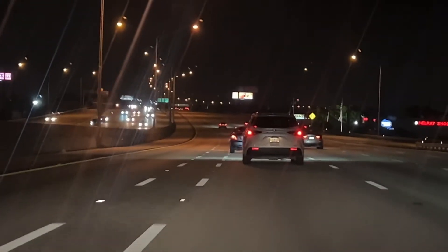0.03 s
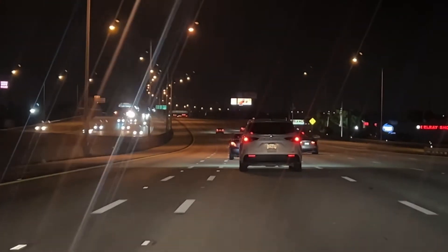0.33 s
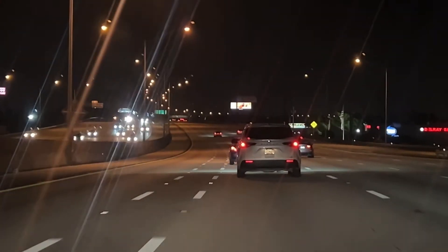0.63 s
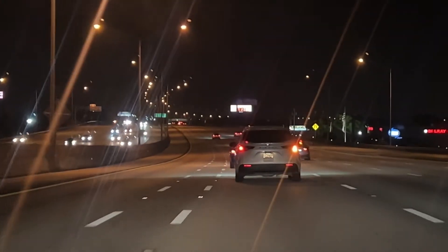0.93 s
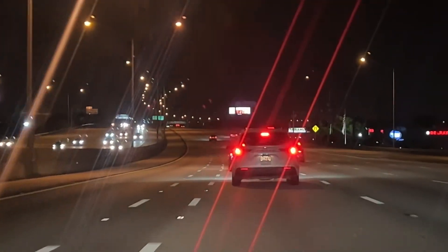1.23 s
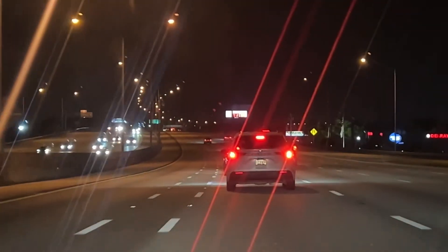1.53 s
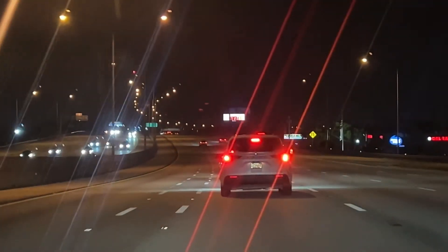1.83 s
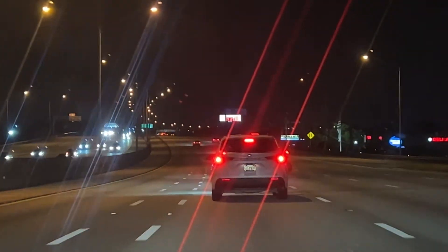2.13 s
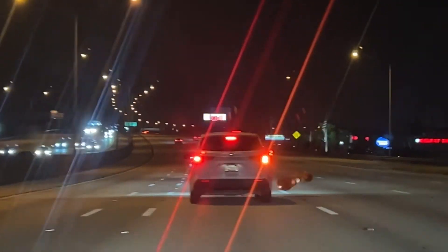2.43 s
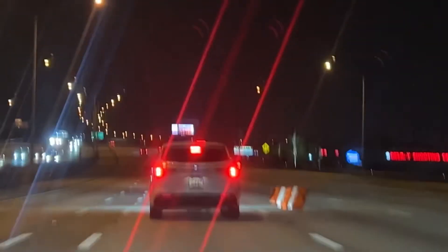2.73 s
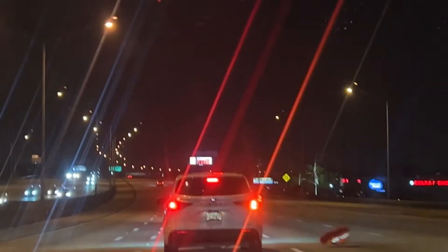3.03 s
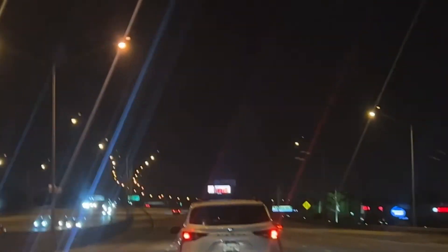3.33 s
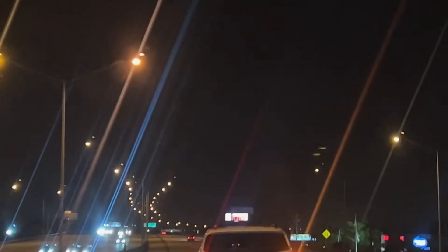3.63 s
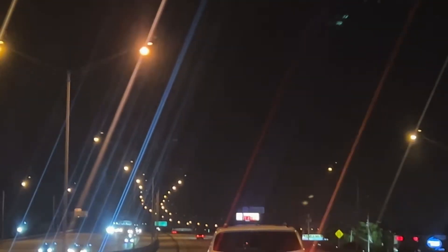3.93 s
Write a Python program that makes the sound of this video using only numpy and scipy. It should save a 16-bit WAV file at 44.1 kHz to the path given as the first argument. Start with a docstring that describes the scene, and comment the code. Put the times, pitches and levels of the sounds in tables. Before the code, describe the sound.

Inside a car at highway speed, tyres rumble and the cabin booms, wheels thudding over seams. Close to the microphone, a grip shifts on a plastic case: faint ticks, a knock, a growing dry rustle, then a sharp snap.

```python
"""Inside a car on a highway at night. From the start, tyres rumble through the body all around, the air inside
the tyres booms over the drone of the drive train, and air hisses faintly at the window seals. Soon the wheels
begin to thump over seams. Right at the microphone a hand shifts its grip on a plastic case: a few faint ticks,
a knock at 1.6 s, then a dry sliding rustle that builds among more knocks. The case snaps once, sharply, at 3.3
s, and the hand settles."""
import sys
import numpy as np
from scipy import signal
from scipy.fft import rfft, irfft
from scipy.io import wavfile

SR = 44100
rng = np.random.default_rng(int(sys.argv[2]) if len(sys.argv) > 2 else 0)


def dump(signal):
    """Clip the signal to [-1, 1] and save it as 16-bit WAV at the path in sys.argv[1]."""
    limited = np.clip(np.atleast_2d(signal).T, -1, 1)
    pcm = np.round(limited * 32767).astype(np.int16)
    wavfile.write(sys.argv[1], SR, pcm)


N = 176400
T, HZ = np.arange(N) / SR, np.maximum(np.arange(N // 2 + 1) * SR / N, 1)

# Knocks and clicks of the case. Each row: start in seconds, level in dB in the low, middle, high and
# top band, pitch in Hz of the part that rings most, its level in dB.
CONTACTS = [(0.378, -65, -76, -68.5, -67, 6670, -76.5), (.515, -67, -81.5, -71.5, -79, 7100, -72),
            (1.362, -66, -70, -72, -74, 6880, -68), (1.582, -27, -50, -56, -68, 1198, -23.5),
            (1.585, -38, -41.5, -47, -66, 2215, -35), (1.594, -41.5, -54, -58, -73, 1475, -38),
            (1.82, -50, -51, -54, -72, 4700, -47), (2.023, -46, -67, -44.5, -62, 9060, -42),
            (2.332, -59, -61, -56, -64, 6900, -55), (2.369, -51, -54, -66, -68, 2620, -52),
            (2.41, -54.5, -66, -49.5, -54, 2290, -47), (2.457, -53, -59.5, -46.5, -57, 8100, -55),
            (2.571, -46, -43.5, -49, -70, 6280, -36.5), (2.578, -40, -45, -60, -68, 2370, -29.5),
            (2.68, -65, -67, -60, -73, 6900, -62), (2.729, -56.5, -59, -47.5, -66, 7500, -59),
            (2.895, -50, -56, -52, -62, 6200, -48), (2.993, -36, -33.5, -38, -52, 7540, -30),
            (3.073, -44.5, -45, -36, -25.5, 7180, -23), (3.16, -39.5, -58, -41.5, -32, 9450, -33),
            (3.216, -30.5, -39, -43, -57, 2150, -28), (3.281, -39.5, -27, -32, -20, 2520, -22.5),
            (3.283, -47, -29.5, -31, -21, 4940, -24.5), (3.287, -46, -35, -23.5, -21, 9050, -12),
            (3.302, -36.5, -40, -41, -59, 1580, -29), (3.333, -36.5, -36.5, -49, -54, 2840, -39),
            (3.369, -41.5, -36.5, -43, -52, 6240, -32), (3.375, -50, -46, -53, -56, 4700, -40),
            (3.413, -67, -46, -43, -52, 7700, -38), (3.459, -32.5, -41, -40, -53, 776, -25.5),
            (3.534, -30.5, -42, -32, -45, 1265, -28), (3.594, -41.5, -35.5, -38.5, -48, 2620, -34),
            (3.642, -55.5, -39, -35.5, -32, 3850, -32), (3.864, -55.5, -60, -50, -49, 8140, -42.5),
            (3.97, -57, -75, -75, -83, 2430, -51)]
# Those four bands. Each row: lower edge in Hz, upper edge in Hz.
CONTACT_BANDS = [(700, 1340), (2000, 6000), (6600, 9900), (11400, 31000)]
# Resonances of the plastic case. Each row: centre in Hz, width in Hz, lift in dB.
CASE_RESONANCES = [(731.5, 150, 18.5), (1093, 64, 13), (1610, 370, 9), (2170, 110, 10.5), (2464, 150, 11),
                   (2825, 140, 15.5), (3690, 100, 8.5), (5100, 290, -4), (6000, 180, 1.5), (6440, 170, 4),
                   (8600, 110, 6), (8670, 130, 6), (9650, 100, 4.5), (11100, 330, -6.5), (13700, 68, 3)]


def from_db(db):
    """Decibels to gain."""
    return 10 ** (np.asarray(db) / 20)


def rms_one(x):
    """Scale to rms 1."""
    return x / np.sqrt(np.mean(x ** 2) + 1e-20)


def in_time(rows):
    """Each column of a curve at every sample."""
    times, *columns = np.transpose(rows)
    return [np.interp(T, times, column) for column in columns]


def at_hz(points):
    """A table over log frequency, read at every bin."""
    hz, value = np.transpose(points)
    return np.interp(np.log(HZ), np.log(hz), value)


def white():
    """Fresh white noise."""
    return rng.standard_normal(N)


def colour(x, gain):
    """Filter by a gain per bin; rms 1."""
    return rms_one(irfft(rfft(x) * gain, N))


def drift(rate_hz):
    """Random wander, mostly slower than rate_hz; rms 1."""
    return colour(white(), 1 / (1 + (HZ / rate_hz) ** 2))


def lift_db(resonances):
    """Lift that a set of resonances gives to each frequency."""
    return sum(db / (1 + (2 * (HZ - hz) / width) ** 2) for hz, width, db in resonances)


def tyres():
    """Tyre noise comes through the body from all around; bass and roar follow the road surface."""
    # Road noise in the cabin. Each row: frequency in Hz, relative level in dB.
    spectrum = [(15, -43.5), (25, -11), (42, -5.5), (65, 2), (88, -3), (122, 0), (145, -7), (185, -7),
                (230, -11), (262, -8.5), (305, -10), (350, -15.5), (420, -22.5), (520, -25), (600, -28.5),
                (730, -26), (900, -36), (1300, -43), (2000, -61.5), (3000, -75.5), (3900, -75.5),
                (5000, -80), (8500, -89), (10000, -81), (11500, -100), (16000, -112)]
    # Narrow resonances of cabin and trim. Each row: centre in Hz, width in Hz, lift in dB.
    cabin_resonances = [(174, 10, 3), (224, 16, 6.5), (302, 8.9, 6.5), (416.3, 25, 6.5), (498, 43, 2.5),
                        (721, 35, 2), (9580, 390, 16)]
    # How alike the two sides sound. Each row: frequency in Hz, left-right correlation.
    likeness = [(30, 0.98), (80, 1), (170, 0.89), (330, .82), (650, 0.25), (1200, 0.11), (2500, 0.93),
                (9000, 0.23)]
    # The passing surface. Each row: time in seconds, bass gain in dB, roar gain in dB.
    surface = [(0, -2, 1.5), (.3, 0.5, 1), (.8, -2.5, 0), (1.12, 0, 1), (1.3, -4, 1), (1.58, 2, 1),
               (1.9, 1, 1), (2.2, 1.5, .5), (2.5, -1.5, 1.5), (2.72, -1, 0), (3.1, 1, -.5), (3.55, 3, -1.5),
               (3.8, 2, -3), (4, -4, -4.5)]
    level_db, flutter_db, bass_edge_hz = -18.5, 0.5, 172
    alike = at_hz(likeness)
    mid = rfft(white()) * np.sqrt(1 + alike)
    side = rfft(white()) * np.sqrt(1 - alike)
    gain = from_db(at_hz(spectrum) + lift_db(cabin_resonances))
    noise = rms_one(irfft(gain * np.array([mid + side, mid - side]), N))
    bass = irfft(rfft(noise) / (1 + (HZ / bass_edge_hz) ** 10), N)
    roar = noise - bass
    bass_db, roar_db = in_time(surface)
    roar_db = roar_db + flutter_db * drift(42)
    return from_db(level_db) * (bass * from_db(bass_db) + roar * from_db(roar_db))


def hum(levels, hz, wander_hz, waver_db):
    """A low tone that wanders in pitch and strength."""
    phase = 2 * np.pi * np.cumsum(hz + wander_hz * drift(11.9)) / SR
    tone = np.sin(phase) * from_db(waver_db * drift(32))
    return from_db(in_time(levels)[0]) * rms_one(tone)


def tyre_boom():
    """The air inside the tyres booms unsteadily around one low pitch."""
    # Swells of the boom. Each row: time in seconds, level in dB.
    levels = [(0, -28.5), (.3, -21), (.8, -21.5), (1.1, -21), (1.35, -37), (1.9, -34.5), (2.47, -15.5),
              (2.75, -23), (3.1, -17.5), (3.6, -22), (4, -19)]
    return hum(levels, hz=101.45, wander_hz=5.08, waver_db=3)


def drive_train():
    """The drive train drones deep beneath the boom."""
    # Swells of the drone. Each row: time in seconds, level in dB.
    levels = [(0, -30.5), (.22, -28), (.35, -41), (1.45, -38.5), (1.72, -29), (2.08, -28), (2.2, -32.5),
              (2.75, -24), (3.1, -30.5), (4, -37.5)]
    return hum(levels, hz=46.24, wander_hz=1.34, waver_db=0.5)


def wind():
    """Air rushes past the window seals: a faint hiss with thin whistles."""
    # The air eases as the car slows. Each row: time in seconds, level in dB.
    levels = [(0, -65.5), (.8, -67.5), (1.15, -71), (1.6, -71.5), (4, -70.5)]
    # Colour of the hiss. Each row: frequency in Hz, relative level in dB.
    spectrum = [(900, -25.5), (1800, 6.5), (2700, -4.5), (4200, -8.5), (5200, -12.5), (7000, -17),
                (10000, -40.5), (13000, -62.5)]
    # Whistles at the seals. Each row: centre in Hz, width in Hz, lift in dB.
    whistles = [(2630, 90, 10.5), (3430, 57, 9), (3780, 120, 8.5), (6600, 220, 5)]
    level_db = in_time(levels)[0] + drift(7.5)  # flutters by about 1 dB
    return from_db(level_db) * colour(white(), from_db(at_hz(spectrum) + lift_db(whistles)))


def ripple_db():
    """Dense small modes of the case cut fine peaks and dips into a spectrum."""
    depth_db, delay_spread_s = 4.4, 0.0012
    reflections = white() * np.exp(-np.minimum(T / delay_spread_s, 50))
    return depth_db * rms_one(rfft(reflections).real)


def case_clicks():
    """Each contact is a brief crunch in the case's resonances; the top band dies first."""
    # Decay of the crunch. Each entry, from low band to top: seconds to fall by 60 dB.
    band_t60_s = [0.058, 0.076, 0.066, 0.047]
    attack_s, hold_s = 0.0035, 0.00088
    body = from_db(lift_db(CASE_RESONANCES) + ripple_db())
    out = np.zeros(N)
    for k, ((low, high), t60) in enumerate(zip(CONTACT_BANDS, band_t60_s)):
        power = np.zeros(N)
        for start_s, *levels_db, _, _ in CONTACTS:
            start = int(start_s * SR)
            age = T[:min(SR // 4, N - start)]
            shape = np.minimum(age / attack_s, 1) * from_db(-60 * np.maximum(age - hold_s, 0) / t60)
            power[start:start + len(age)] += (from_db(levels_db[k]) * shape) ** 2
        band = 1 / np.sqrt((1 + (low / HZ) ** 10) * (1 + (HZ / high) ** 10))
        out += np.sqrt(power) * colour(white(), band * body)
    return out


def case_rings():
    """Each contact rings the modes of the case, and one part of it most of all."""
    # Modes of the case. Each row: pitch in Hz, dB relative to the contact there, seconds to fall 60 dB.
    case_modes = [(1031, -7, 0.12), (1580, -4.5, 0.066), (2410, -6, 0.041), (2877, -11.5, .075),
                  (3620, -14.5, .072), (5140, -7, .067), (6800, -8.5, .065), (8900, -4.5, 0.055),
                  (9450, -6.5, .076)]
    attack_s, part_t60_s = 0.0025, 0.034
    spread_db, detune_share = 0.5, 0.015  # the grip shifts the modes from contact to contact
    log_centres = np.log(CONTACT_BANDS).mean(axis=1)
    out = np.zeros(N)
    for start_s, *levels_db, part_hz, part_db in CONTACTS:
        start = int(start_s * SR)
        age = T[:min(SR // 4, N - start)]
        attack = np.minimum(age / attack_s, 1)
        modes = []
        for hz, db, t60 in case_modes:
            contact_db = np.interp(np.log(hz), log_centres, levels_db)
            detuned_hz = hz * (1 + detune_share * rng.normal())
            modes.append((detuned_hz, db + contact_db + spread_db * rng.normal(), t60))
        for hz, db, t60 in modes + [(part_hz, part_db, part_t60_s)]:
            wave = np.sin(2 * np.pi * (hz * age + rng.random()))
            out[start:start + len(age)] += from_db(db - 60 * age / t60) * attack * wave
    return out


def seam_thumps():
    """Each seam under the wheels makes the body swell and ring briefly; some thumps sink in pitch."""
    # Seams in the road. Each row: start in seconds, level in dB, pitch in Hz, fall in octaves a second.
    seams = [(0.684, -15, 303.3, 0), (0.728, -12, 65.1, -0.5), (1.096, -11, 101.3, 0),
             (2.021, -9, 105.3, 10.5), (2.025, -17, 167, 0), (1.98, -20.5, 299.3, -0.5),
             (2.573, -14, 60, 0), (2.792, -8.5, 99, 5.5), (2.785, -15, 135.1, 0.5), (2.857, -11.5, 96.5, 3),
             (3.114, -6.5, 85.4, -0.5), (3.478, -11, 76.5, 0)]
    rise_s = 0.018
    out = np.zeros(N)
    for start_s, db, hz, fall in seams:
        age = np.maximum(T - start_s, 0)
        swell = (age / rise_s * np.exp(1 - age / rise_s)) ** 2
        pitch_hz = hz * 2 ** (-fall * age) * (age > 0)
        out += from_db(db) * swell * np.sin(2 * np.pi * np.cumsum(pitch_hz) / SR)
    return out


def friction():
    """Dense tiny slips over smooth rubbing noise."""
    slips_per_s, spread_db, slip_share = 900, 1, 0.3
    sizes = from_db(spread_db * np.minimum(rng.exponential(1, N), 5)) * rng.choice([-1, 1], N)
    slips = rms_one(sizes * (rng.random(N) < slips_per_s / SR))
    return np.sqrt(slip_share) * slips + np.sqrt(1 - slip_share) * white()


def hand_slide():
    """Skin drags unevenly over the case: a bright hiss and, under pressure, a lower rasp."""
    # The hand's movement. Each row: time in seconds, hiss level in dB, rasp level in dB.
    levels = [(.9, -88.5, -84.5), (1.02, -73.5, -75), (1.14, -94.5, -78), (1.8, -77.5, -78.5),
              (1.845, -63, -56), (1.89, -76, -76), (1.98, -74, -85), (2.045, -53.5, -52.5),
              (2.125, -71.5, -69.5), (2.17, -60, -71), (2.5, -60.5, -59.5), (2.56, -51, -53.5),
              (2.64, -65.5, -88.5), (2.79, -52.5, -55.5), (2.92, -46.5, -49.5), (3.0, -42, -36.5),
              (3.06, -41.5, -43), (3.14, -48.5, -45), (3.26, -52.5, -48), (3.32, -45, -42.5),
              (3.44, -58, -54), (3.49, -34.5, -41.5), (3.56, -38.5, -42), (3.62, -43.5, -46.5),
              (3.65, -42.5, -53.5), (3.72, -49, -51.5), (3.81, -63, -84.5), (4, -69.5, -84)]
    # Colours of the hiss and the rasp. Each row: frequency in Hz, relative level in dB.
    hiss_spectrum = [(1200, -16.5), (2400, -3.5), (3200, -0.5), (4700, -1.5), (6000, 2.5), (7200, 1.5),
                     (9000, 1), (10400, -0.5), (11500, -13.5), (13000, -12.5), (14200, -8), (15500, -9)]
    rasp_spectrum = [(300, -8.5), (550, 7.5), (800, 6.5), (1150, -2), (1500, -1), (2000, 0), (2600, -2.5),
                     (3200, -17.5), (6000, -31)]
    resonance_share, uneven_db = 0.3, 1.94
    hiss_db, rasp_db = in_time(levels)
    body_db = resonance_share * lift_db(CASE_RESONANCES) + 0.5 * ripple_db()
    hiss = from_db(hiss_db) * colour(friction(), from_db(at_hz(hiss_spectrum) + body_db))
    rasp = from_db(rasp_db) * colour(friction(), from_db(at_hz(rasp_spectrum) + body_db))
    return (hiss + rasp) * from_db(uneven_db * drift(32))


def hand_scrapes():
    """Short scrapes swell and fade, each stirring one resonance of the case."""
    # Each row: start in seconds, length in seconds, centre in Hz, half-width in Hz, level in dB.
    strokes = [(2.009, 0.092, 3640, 450, -58.5), (2.024, 0.068, 5840, 700, -56.5),
               (2.12, 0.28, 3750, 220, -65), (2.14, 0.18, 5600, 406, -68), (2.523, 0.03, 8950, 3500, -53),
               (2.965, .13, 728, 128.4, -39), (2.971, 0.13, 1060, 118.4, -40.5),
               (3.307, 0.065, 2430, 249, -45), (3.454, 0.044, 755, 129, -32.5),
               (3.461, 0.052, 2140, 200, -44), (3.279, 0.024, 5350, 600, -36),
               (3.537, 0.037, 1130, 245, -35)]
    out = np.zeros(N)
    for start_s, length_s, hz, half_width_hz, db in strokes:
        progress = np.clip((T - start_s) / length_s, 0, 1)
        swell = np.sqrt(4 * progress * (1 - progress))
        band = 1 / (1 + ((HZ - hz) / half_width_hz) ** 2)
        out += from_db(db) * swell * colour(friction(), band)
    return out


def scene():
    """The car all around, the hand right at the microphone and a little to the right."""
    # Lean of car and hand. Each row: frequency in Hz, dB added on the left and taken from the right.
    car_lean = [(25, -1.5), (80, 1), (160, -0.36), (300, 0.8), (600, 0), (2000, -0.5)]
    hand_lean = [(500, -3), (800, 0), (1200, -2.5), (2400, 0.2), (4000, 0)]
    # Diffuse part of the hand's sound. Each row: frequency in Hz, gain in dB.
    diffuse_gain = [(500, -3.5), (1200, -1), (2000, -16), (3000, -18), (5000, -26.5), (9000, -13),
                    (15000, -14)]
    # Close sounds reach the right side later. Each row: frequency in Hz, phase lag in radians.
    right_lag = [(0, 0), (900, 0), (1100, 2.5), (1200, 4.5), (1400, 6.28), (8750, 6.28), (15750, 18.85),
                 (22050, 30)]
    car = rfft(tyres() + tyre_boom() + drive_train() + seam_thumps() + wind())
    direct = rfft(hand_slide() + hand_scrapes() + case_clicks() + case_rings())
    diffuse = rfft(hand_slide() + case_clicks()) * from_db(at_hz(diffuse_gain))
    lag = np.exp(-1j * np.interp(HZ, *np.transpose(right_lag)))
    hand = np.array([direct + diffuse, (direct - diffuse) * lag])
    car_pan, hand_pan = (from_db(at_hz(lean) * [[1], [-1]]) for lean in (car_lean, hand_lean))
    return irfft(car * car_pan + hand * hand_pan, N)


def record(dry):
    """The sound fades in at once; the deepest rumble rolls off and the top is cut steeply."""
    fade_in_s, low_cut_hz, high_cut_hz = 0.004, 37, 15900
    low_cut = signal.butter(2, low_cut_hz, "high", fs=SR, output="sos")
    high_cut = signal.ellip(10, 0.2, 80, high_cut_hz, fs=SR, output="sos")
    faded = dry * np.minimum(T / fade_in_s, 1)
    return signal.sosfilt(high_cut, signal.sosfilt(low_cut, faded))


dry = scene()
out = record(dry)
dump(out)
```